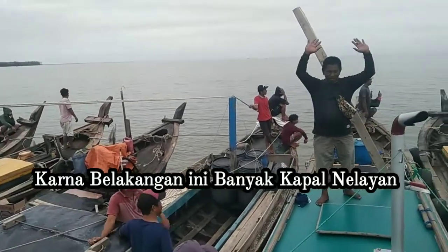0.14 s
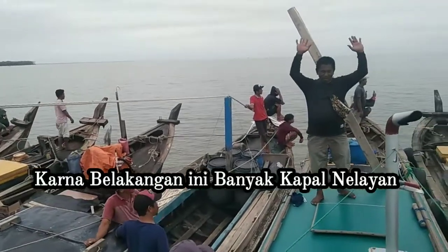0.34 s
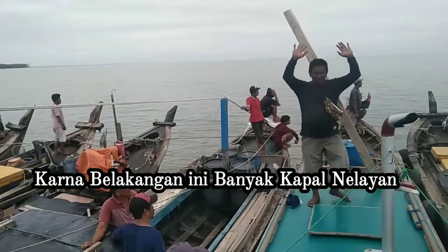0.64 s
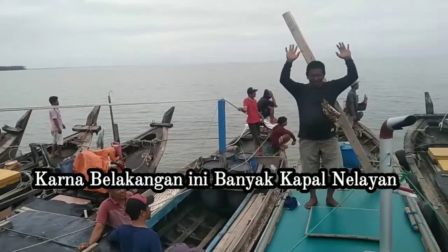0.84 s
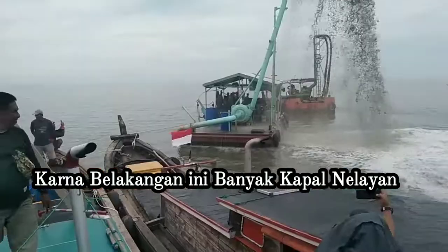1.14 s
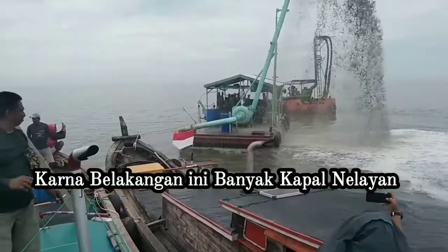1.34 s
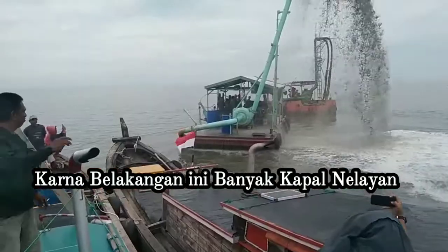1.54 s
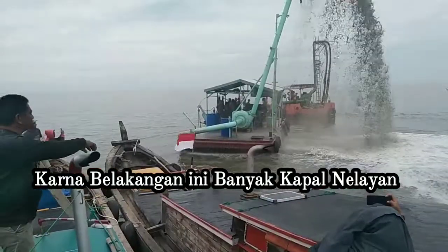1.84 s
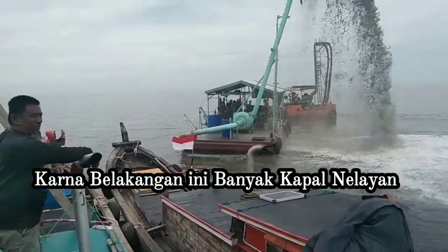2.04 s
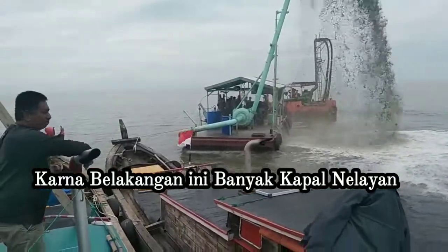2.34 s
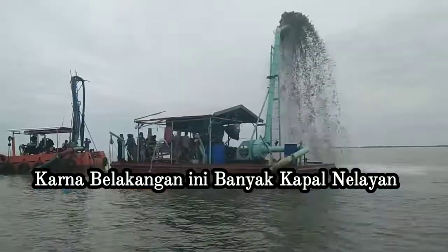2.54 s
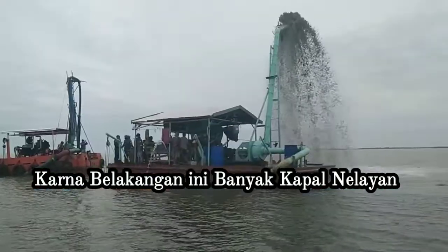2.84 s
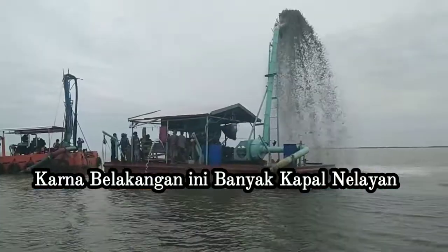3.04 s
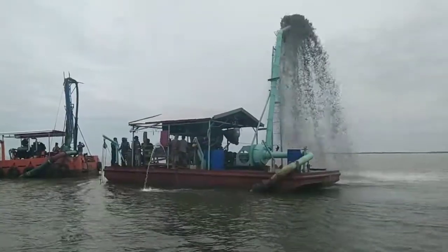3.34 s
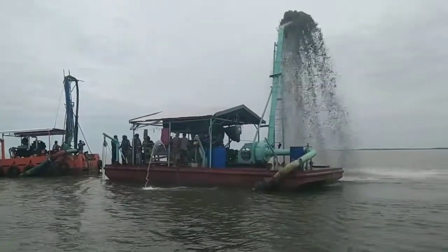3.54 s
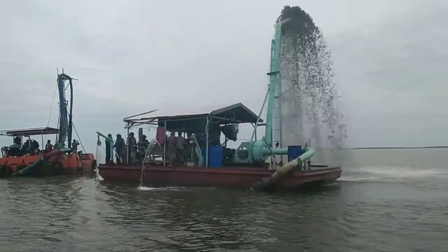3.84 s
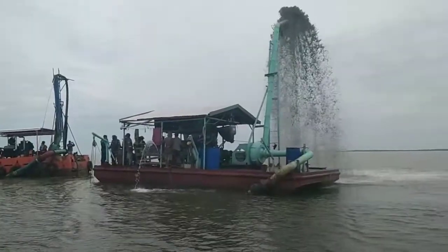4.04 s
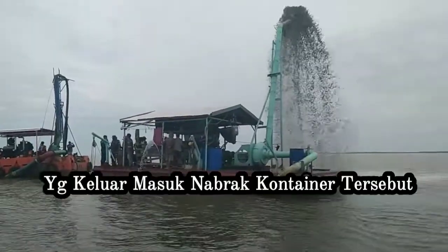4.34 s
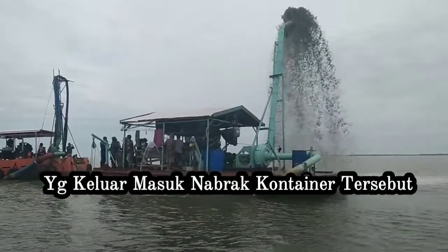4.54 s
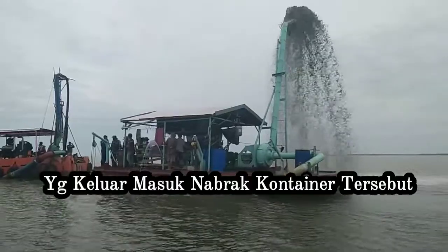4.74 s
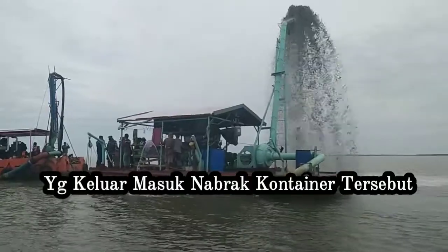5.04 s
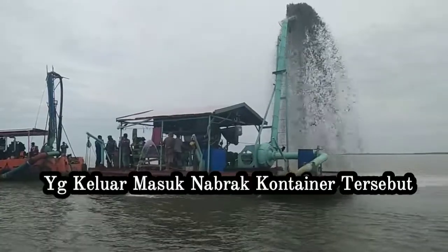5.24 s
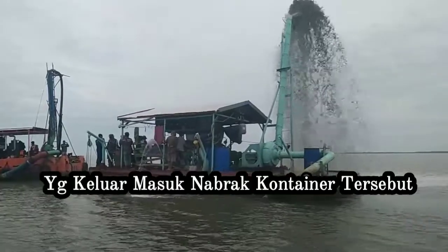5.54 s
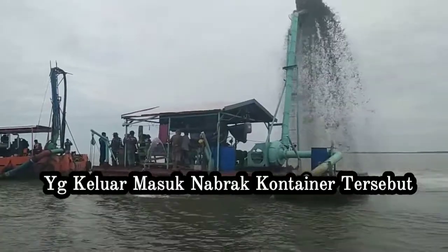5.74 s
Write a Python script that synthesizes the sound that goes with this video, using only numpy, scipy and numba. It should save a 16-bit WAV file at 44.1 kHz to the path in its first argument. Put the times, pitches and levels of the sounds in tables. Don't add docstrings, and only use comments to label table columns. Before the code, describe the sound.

A lumpy eight-cylinder diesel runs a slurry pump on open water, close and dry, with no noticeable echo. From 0 to about 1 second it makes a dense, mid-heavy rattle: roughly eight uneven engine cycles a second, each a flurry of knocks, over low exhaust throb, faint hum and rumble, and hissing, gurgling splash. A tiny tick comes at 0.9; at about 0.96 the tone changes, with brighter valve clatter and a different metallic ring. At 2.26 the sound cuts dead, gives one very short, thin hiccup near 2.4, then returns faintly at 2.47, rising to full level by 2.6, with bass filling in last by 2.8. The final view has less extreme treble, many narrow ringing metal covers, and irregular hard tappet snaps, more frequent after 4 seconds. The low throb swells modestly around 4.5. The speed stays nearly constant, and the engine is still running when it ends at 5.9.

```python
import sys
import numpy as np
from scipy import signal
from scipy.fft import rfft, irfft, next_fast_len
from scipy.io import wavfile
from scipy.ndimage import uniform_filter1d
from numba import njit

SR = 44100
rng = np.random.default_rng(int(sys.argv[2]) if len(sys.argv) > 2 else 0)


def volts(x):
    e = np.asarray(x, float) / 20
    return 10 ** e


def dump_mix(stems):
    frames = np.atleast_2d(stems).T
    limited = np.clip(frames, -1, 1)
    pcm = np.round(limited * 32767).astype(np.int16)
    wavfile.write(sys.argv[1], SR, pcm)


N = 260190

# opens t/s, closes t/s, crank place at opening/cycles, speed/(cycles/s)
SHOTS = [(0, .964, .556, 7.93), (.964, 2.44, .144, 7.968), (2.46, 5.9, -.066, 8.077)]
MICROPHONE_TOP = [15000, 15000, 12500]
# exhaust level/dB, ring level/dB, clatter level/dB, ring creep/(dB/s), clatter creep/(dB/s)
STANCE = [(1.5, -24.5, -20, 0.7, 1.5), (1, -26, -24.5, -0.5, -0.6), (1.5, -24, -24, 0.65, 0.07)]
# place/cycles, exhaust push level/dB
CYLINDERS = [(.06, 1.5), (0.181, 1), (.314, 3.5), (.425, -3.5), (.557, -7.5), (.69, 0.5), (.82, 6),
             (.94, 1)]
# f/cycle rate, width/Hz, level/dB at each of the three places
EXHAUST_MODES = [(7.98, 4.3, -29.5, -29.5, -27.5), (10.67, 15.5, -36.5, -37.5, -32.5),
                 (13.096, 2.24, -33, -31, -32.5), (16.11, 13.6, -31.5, -31.5, -26.5),
                 (18.5, 5.7, -40, -40, -37.5), (21.06, 2, -50, -43, -36.5), (24.1, 33, -45.5, -49.5, -43),
                 (27.2, 44, -47.5, -44, -40), (39.58, 4.4, -45, -46.5, -46), (47.4, 4.7, -48, -70, -54)]
# order 32 level/dB, order 33 level/dB, swell/cycles
THROB = [(-41, -44, .62), (-42, -46, .61), (-38, -37, .70)]
# centre/cycles, spread/cycles, level/dB
SURGE = (16.5, 3.5, 2.8)
RING = [(-26, -17.5, -17), (7.5, -16.5, -4.5), (9, -10.5, -6), (4.5, -11.5, -4.5), (5, -12.5, 0),
        (12, -14.5, -6), (2.5, -25, -3), (-27, -15, -6.5)]
CLATTER = [(-3.5, -0.5, 4), (-9, 4, 4), (-12, -5.5, 2), (-7, 0, 4.5), (-9.5, -1.5, -3), (-8, 2, 3),
           (-20, -10.5, -3), (-54, -25.5, -1)]
# resonant share level/dB, splash over knocks level/dB at
# 800, 4500 and 11000 Hz, knock decay t/s, knock delay/cycles
MIX = [(-18.5, 3.9, -1.5, 6.5, 0.0074, 0.0023), (-3, 4.3, 0.5, 0, 0.0072, 0.0068),
       (-0.5, 3, -5.5, -6.5, 0.0061, 0.03067)]
# f/Hz, level/dB at each place
COLOUR = [(100, -47, -52, -13), (198.5, 0, -0.5, 2.5), (320, -1, -2, -4), (457, -8, -8.5, -12.5),
          (583, -4.5, 0.5, 0.5), (867, 5, 4, 0), (1048, -9.5, -8.5, -11.5), (1296, -9.5, -7, -3.5),
          (2560, -5.5, -3.5, -5), (3510, -20, -9.5, -4), (5520, -10.5, -14, -10.5),
          (8170, -22, -9.5, -11.5), (9390, -32.5, -20.5, -21), (13730, -48.5, -44, -49)]
# f/Hz, width/Hz, level/dB
BLOCK = [
    [(795, 200, -1), (904, 140, -6), (1517, 310, 12), (2040, 99, 13), (2600, 180, 6), (3470, 150, 5),
     (5600, 390, -16), (6450, 300, -6)],
    [(740, 61, -15), (1282, 197, 5), (2100, 110, -25), (2230, 110, -2), (2480, 90, -19.5), (2980, 330, -2),
     (4190, 230, -16.5), (7260, 820, -7)],
    [(735, 55, -10), (1467, 51, 3), (1770, 17, 5.5), (2380, 63, -2), (2730, 113, 1), (3070, 364, -4.5),
     (4237, 260, -1), (4880, 320, -3.5), (5670, 230, -13), (7570, 980, -26.5)],
]
# f/Hz, width/Hz, level/dB
CASING = [(817, 130, -38.5), (740, 83, -38), (775, 17.7, -29)]
# t/s, peak level/dB
HARD_KNOCKS = [(2.4808, -24.5), (2.5117, -20), (2.607, -9.5), (2.6833, -10.5), (2.7302, -3.5),
               (2.8535, -12), (2.9757, -16), (3.0999, -7.5), (3.5953, -17.5), (3.717, -15), (3.9674, -8.5),
               (4.0896, -14), (4.2129, -12), (4.3381, -12), (4.4154, -10.5), (4.4618, -6), (4.5855, -7.5),
               (4.7092, -12), (4.8335, -9.5), (4.9567, -7), (5.035, -7.5), (5.0644, -14.5), (5.0799, -2.5),
               (5.2046, -4), (5.2829, -9.5), (5.3278, -9), (5.4511, -6.5), (5.483, -8), (5.5299, -11),
               (5.5778, -11)]

CUT_S, HICCUP_S, RETURN_S, FULL_S = 2.2625, 2.393, 2.468, 2.603
HICCUP_HOLD_S = 0.013


def level(x, db):
    return x * volts(db) / np.sqrt(np.mean(x ** 2))


@njit
def svf(x, hz, width):
    y, band, low = np.empty(len(x)), 0., 0.
    for i in range(len(x)):
        g, k = np.tan(np.pi * hz[i] / SR), width / hz[i]
        v = (band + g * (x[i] - low)) / (1 + g * (g + k))
        band = 2 * v - band
        low = low + 2 * g * v
        y[i] = k * v
    return y


def mode(x, hz, width, skirt, wander=0):
    centre = hz * (1 + wander + np.zeros(len(x)))
    return svf(svf(x, centre, 1. * width), centre, 1. * skirt)


def lag(x, seconds):
    return signal.lfilter([1], [1, -np.exp(-1 / (seconds * SR))], x)


def walk(count, rate):
    k = int(SR / rate)
    steps = np.repeat(rng.standard_normal(count // k + 1), k)
    return 1.39 * uniform_filter1d(uniform_filter1d(steps, k), k)[:count]


def firings(cycles, jitter_s):
    turns = np.arange(np.floor(cycles[0]), np.ceil(cycles[-1]))
    places = (turns[:, None] + np.array(CYLINDERS)[:, 0]).ravel()
    at = np.interp(places, cycles, np.arange(len(cycles)), -1e4, 1e9)
    at = at + jitter_s * SR * rng.standard_normal(len(places))
    inside = (at > 0) & (at < len(cycles) - 1)
    cylinder = np.arange(len(at)) % len(CYLINDERS)
    return np.where(inside, at, len(cycles)).astype(int), cylinder


def pulses(at, db, scatter_db, count):
    sizes = volts(db + scatter_db * rng.standard_normal(len(at)))
    return np.bincount(at, sizes, count + 1)[:count] + 1e-18


def exhaust_pipe(cycles, shot):
    rate = (cycles[-1] - cycles[0]) * SR / len(cycles)
    before = SR // 2
    lead = np.r_[cycles[0] - np.arange(before, 0, -1) * rate / SR, cycles]
    at, cylinder = firings(lead + 1 / 16, jitter_s=0.00034)
    push = pulses(at, np.array(CYLINDERS)[cylinder, 1], scatter_db=1.53, count=len(lead))
    out = 0
    for order, width, *db in EXHAUST_MODES:
        ring = mode(push, order * rate, width, 2 * width)[before:]
        out = out + level(ring, db[shot])
    return out


def throb(cycles, shot):
    low_db, high_db, place = THROB[shot]
    centre, spread, surge_db = SURGE
    angle = 2 * np.pi * (cycles - place)
    beat = level(np.cos(32 * angle), low_db) + level(np.cos(33 * angle), high_db)
    swell_db = surge_db * np.exp(-((cycles - centre) / spread) ** 2)
    return beat * volts(swell_db + .8 * walk(len(cycles), 4.95))


def pump_hum(count):
    return level(np.sin(2 * np.pi * 35.4 * np.arange(count) / SR), -48)


def hull_rumble(count):
    return level(mode(rng.standard_normal(count), 40, 50, 80), -51)


def blow_force(at, t):
    force_db = 1.7 * rng.standard_normal(len(at))
    struck = t[np.minimum(at, len(t) - 1)]
    usual_db = np.mean(HARD_KNOCKS, axis=0)[1]
    for when, db in HARD_KNOCKS:
        fade_db = 20 * np.log10(edit(np.array(when))[0])
        force_db[np.abs(struck - when) < .005] = 1.0 + 0.39 * (db - fade_db - usual_db)
    return force_db


def block_and_covers(shake, shot):
    rings, count = 0, len(shake)
    for hz, width, db in BLOCK[shot]:
        swell = volts(db + 2 * walk(count, 14.))
        shift = .4 * min(width / hz, .06) * walk(count, 60.)
        rings = rings + swell * mode(shake, hz, width, 2.8 * width, wander=shift)
    return rings


def casing(at, cylinder, ring_db, shot, count):
    hz, width, db = CASING[shot]
    strike_db = np.where(cylinder == 3, 0, ring_db - 7)
    strikes = pulses(at, strike_db, scatter_db=1.5, count=count)
    return level(mode(strikes, hz, width, 150.), db)


def rattle_and_splash(cycles, t, shot):
    count, size = len(cycles), next_fast_len(len(cycles))
    resonant_db, *splash_db, decay_s, delay = MIX[shot]
    at, cylinder = firings(cycles - delay, jitter_s=0.00044)
    ring_db, clatter_db = np.array([RING, CLATTER])[:, cylinder, shot]
    _, ring_mid, clatter_mid, ring_creep, clatter_creep = STANCE[shot]
    ring_drift = ring_mid + ring_creep * (t - t.mean())
    clatter_drift = clatter_mid + clatter_creep * (t - t.mean())
    force_db = blow_force(at, t)
    swell_db = .6 * walk(count, 3.)
    octave = np.log2(np.arange(size // 2 + 1) * SR / size + 1)
    knocks, splash = 0, 0
    for centre in np.arange(7, 14.2, 1 / 3):
        bright = np.clip((centre - 10.2) / 1.57, 0, 1)
        late = (.0007 * SR * rng.standard_normal(len(at))).astype(int)
        loose = np.clip(at + late, 0, count)
        blow_db = force_db + ring_db + bright * (clatter_db - ring_db)
        blows = pulses(loose, blow_db, scatter_db=2.5, count=count)
        burst = lag(lag(blows, 0.001), decay_s) * rng.standard_normal(count)
        gurgle = volts(swell_db + 1.13 * walk(count, 44.94)) * rng.standard_normal(count)
        wet_db = np.interp(centre, np.log2([800, 4500, 11000]), splash_db)
        db = ring_drift + bright * (clatter_drift - ring_drift) - 10 * np.log10(1 + volts(2 * wet_db))
        band = np.cos(np.pi * np.clip(1.5 * (octave - centre), -.5, .5))
        knocks = knocks + band * rfft(level(burst, db), size)
        splash = splash + band * rfft(level(gurgle, db + wet_db), size)
    table = np.array(COLOUR)
    colour = volts(np.interp(octave, np.log2(table[:, 0]), table[:, 1 + shot]))
    edge = 1 + 2 ** (30 * (octave - np.log2(MICROPHONE_TOP[shot])))
    broad = irfft((knocks + splash) * colour / edge, size)[:count]
    shake = irfft(knocks + volts(-9.5) * splash, size)[:count]
    rings = block_and_covers(shake, shot)
    return volts(13.0) * (broad + volts(resonant_db) * rings) + casing(at, cylinder, ring_db, shot, count)


def edit(t):
    hiccup_end = HICCUP_S + HICCUP_HOLD_S
    hiccup_db = -1 - 5400 * np.maximum(t - hiccup_end, 0)
    since = t - RETURN_S
    rise_db = -26.5 + (-10 + 26.5) * since / 0.017
    creep_db = -10 + 32 * since
    fade_db = np.minimum(rise_db, creep_db)
    stages = [t < CUT_S, t < HICCUP_S, t < RETURN_S, t < FULL_S]
    gain = np.select(stages, [1, 0, volts(hiccup_db), volts(fade_db)], 1)
    stop = np.where(t < HICCUP_S, CUT_S, hiccup_end)
    residue_db = -34 - 700 * np.maximum(t - stop, 0)
    return gain, (t >= CUT_S) * (t < RETURN_S) * volts(residue_db)


def tappet_ticks(t):
    when, db = np.transpose(HARD_KNOCKS)
    at = np.searchsorted(t, when)
    snap = lag(np.bincount(at, volts(db), len(t)), 0.0029) * rng.standard_normal(len(t))
    pitch = np.interp(t, when, 0.029 * rng.standard_normal(len(at)))
    hz, width = 4770, 640
    return level(mode(snap, hz, width, 2 * width, wander=pitch), -35.5)


def scene():
    t, out = np.arange(N) / SR, np.zeros(N)
    for shot, (opens, closes, place, speed) in enumerate(SHOTS):
        span = (t >= opens) & (t < closes)
        now = t[span]
        cycles = place + speed * (now - opens)
        bass_back_s = 2.8
        missing = np.clip((bass_back_s - now) / (bass_back_s - RETURN_S), 0, 1) * (opens > HICCUP_S)
        bass_db = -8.5 * missing - 6 * (now > HICCUP_S) * (now < RETURN_S)
        low = exhaust_pipe(cycles, shot) + throb(cycles, shot)
        low = low + pump_hum(len(now)) + hull_rumble(len(now))
        out[span] = low * volts(STANCE[shot][0] + bass_db) + rattle_and_splash(cycles, now, shot)
    out[int(0.91 * SR)] += volts(-32)
    gain, residue = edit(t)
    dull = signal.sosfilt(signal.butter(2, 400, fs=SR, output="sos"), out)
    return (out * gain + dull * residue + tappet_ticks(t))[None]


def top_cut(x):
    return signal.sosfilt(signal.butter(12, 13580, fs=SR, output="sos"), x)


def record(dry):
    return top_cut(dry)


dry = scene()
out = record(dry)
dump_mix(out)
```